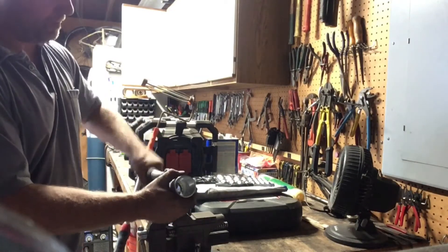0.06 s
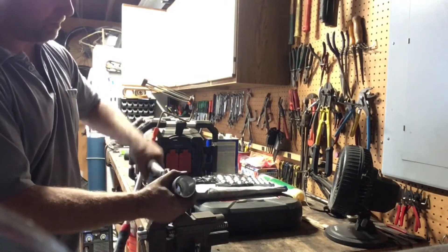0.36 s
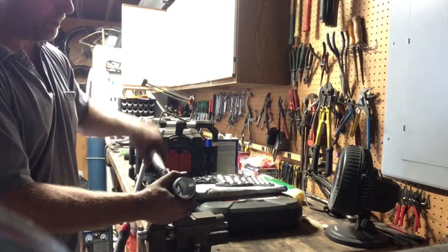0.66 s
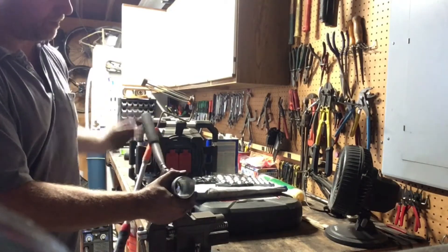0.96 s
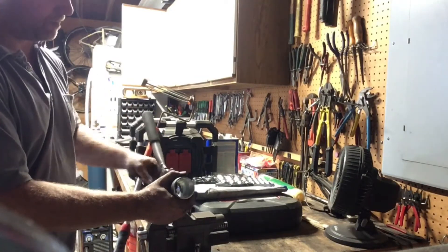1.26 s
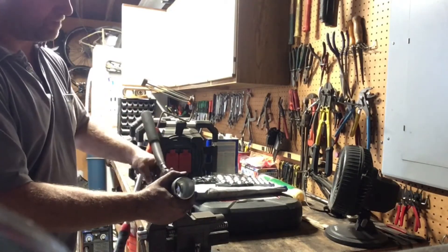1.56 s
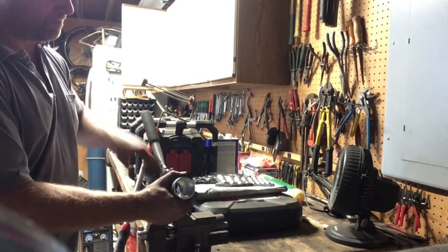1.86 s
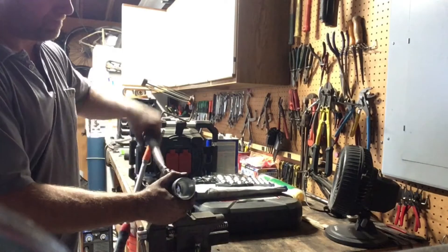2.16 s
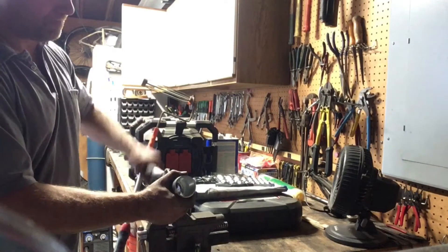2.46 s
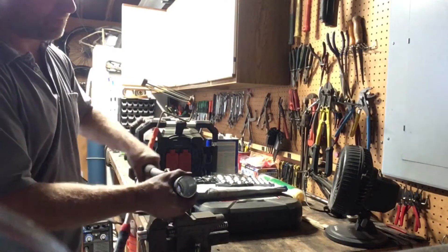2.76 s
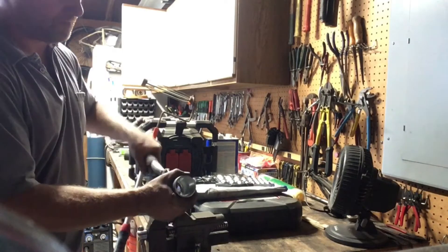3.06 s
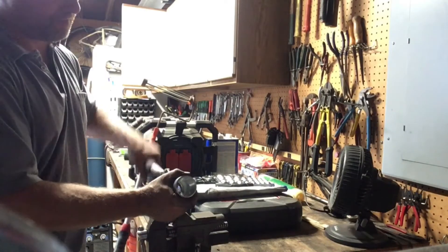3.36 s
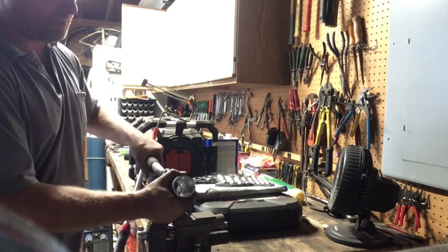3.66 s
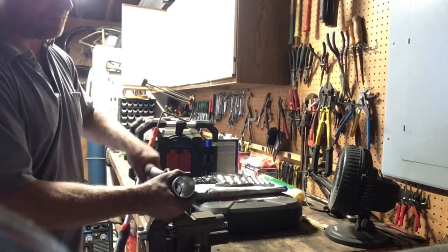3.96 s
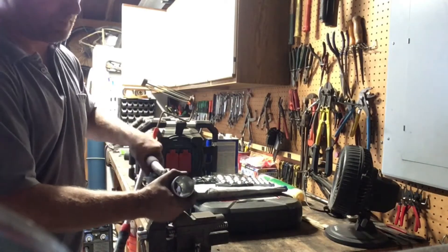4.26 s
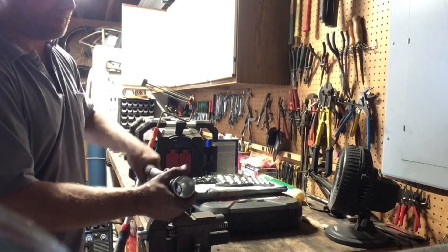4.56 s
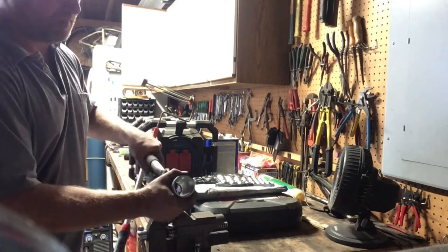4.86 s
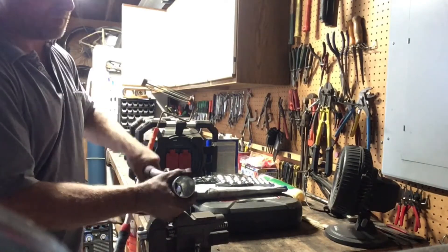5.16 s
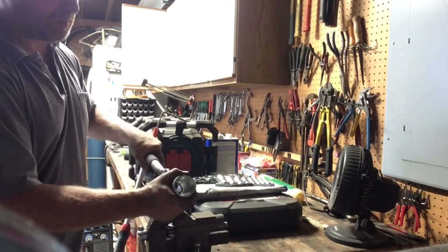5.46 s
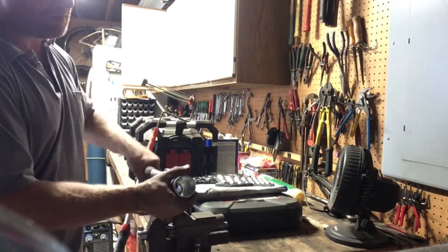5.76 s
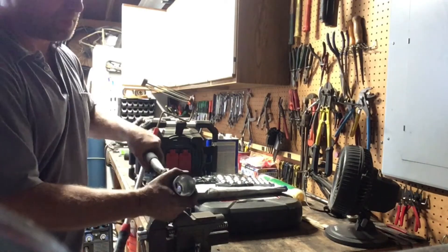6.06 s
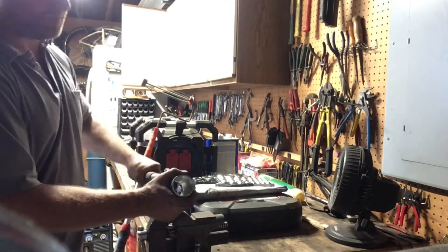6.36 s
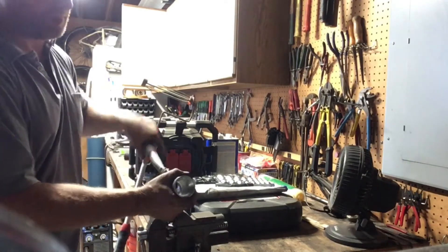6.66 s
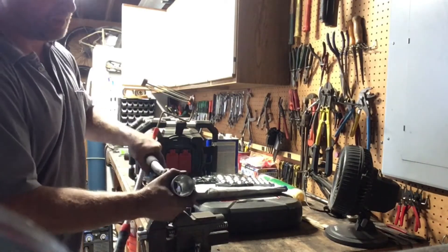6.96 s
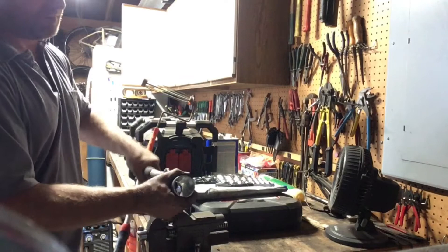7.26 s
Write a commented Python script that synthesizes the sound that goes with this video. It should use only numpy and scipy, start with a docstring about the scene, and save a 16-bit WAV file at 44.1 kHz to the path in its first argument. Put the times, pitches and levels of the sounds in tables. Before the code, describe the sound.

Steel cracks sharply twice as a hand-cranked tool presses a groove into a pipe, each stroke thumping the workbench. The work pauses briefly for faint scraping and small clicks, then resumes with eight evenly paced, ringing clacks, each trailed by the high ping of a loose part. The handle knocks and clinks on its back swings, over the low rumble and short echo of a workshop.

```python
"""A hand beading tool in a bench vise is cranked around a metal pipe, over a workshop's low rumble.
It opens with two sharp bites: each rings the steel and thumps the bench, then a loose part lands with a ping.
From about 1 s the hands pause to tighten the rollers, with faint scrapes, chirps and a few clicks.
From about 2.5 s eight more bites follow and a groove (the bead) forms in the pipe. Between them the
handle clicks as it swings back, squeaks once, and clinks as the tool settles for the next stroke."""
import sys
import numpy as np
from scipy import signal
from scipy.fft import rfft, irfft
from scipy.io import wavfile

SR = 44100
rng = np.random.default_rng(int(sys.argv[2]) if len(sys.argv) > 2 else 0)


def digitize_waveform(pressure):
    """Quantize a signal to 16-bit integers and store it at the path in sys.argv[1].

    Rows of a 2-D input are taken as channels; values are limited to [-1, 1].
    """
    field = np.atleast_2d(pressure).T
    bounded = np.clip(field, -1, 1)
    quanta = np.round(bounded * 32767).astype(np.int16)
    wavfile.write(sys.argv[1], SR, quanta)


N = 331191
TIME = np.arange(N) / SR  # seconds since the scene began
AGE = np.arange(SR) / SR  # seconds since a blow
FREQS = np.arange(SR // 2 + 1) + 1e-3  # the frequencies [Hz] in a one-second sound


def undb(db):
    """Turn decibels into a number to multiply by."""
    return 10 ** (np.asarray(db) / 20)


def add(track, s, sound):
    """Mix a sound into the track, starting at s seconds."""
    start = int(round(s * SR))
    a, b = max(start, 0), min(start + len(sound), N)
    track[a:b] += sound[a - start:b - start]


def along(hz, points_hz, values):
    """Join points with straight lines, giving every octave the same room."""
    return np.interp(np.log(hz), np.log(points_hz), values)


def bump(hz, centre_hz, width_hz, db):
    """A rounded peak in a sound's tone, in dB; a negative one is a dip."""
    return db / (1 + (2 * (hz - centre_hz) / width_hz) ** 2)


def fade(fade_s):
    """A blow dies away, losing 60 dB over its fade time."""
    return undb(-60 * AGE / fade_s)


def swell(rise_s):
    """Vibration takes a moment to build up."""
    return 1 - np.exp(-AGE / rise_s)


def pressed(extra_db, length_s):
    """Steel sounds louder while the parts are still pressed together."""
    return undb(extra_db * np.exp(-(AGE / length_s) ** 2))


def ring(tones, detune):
    """A struck part's fading tones; neighbours swing opposite ways and the load shifts each pitch."""
    shifts = 1 + detune * rng.standard_normal(len(tones))
    return sum((-1) ** k * undb(db) * fade(fade_s) * np.sin(2 * np.pi * hz * shifts[k] * AGE)
               for k, (hz, db, fade_s) in enumerate(tones))


def steady_noise(colour):
    """Even noise of strength 1, shaped by (frequency, level) points."""
    hz = np.arange(N // 2 + 1) * SR / N + 1e-3
    noise = irfft(rfft(rng.standard_normal(N)) * undb(along(hz, *np.transpose(colour))), N)
    return noise / noise.std()


def grainy_noise(grain_db, grain_s=0.0016):
    """One second of noise made of many tiny, uneven contacts."""
    strength = np.interp(AGE / grain_s, np.arange(SR), rng.standard_normal(SR))
    noise = rng.standard_normal(SR) * undb(grain_db * strength)
    return noise / noise.std()


def bead_depth(s, start_s=2.55, forming_s=1.27):
    """Once the rollers are tight, the groove deepens steadily from 0 to 1."""
    return np.clip((s - start_s) / forming_s, 0, 1)


def beaded(tones, depth):
    """The groove stiffens the pipe as it deepens: some tones grow, others weaken."""
    return [(hz, db + (1 - depth) * shallow_db, fade_s) for hz, db, fade_s, shallow_db in tones]


# the tone of the workshop's air: (frequency [Hz], level [dB])
AIR_COLOUR = [(13, -47), (22, -23), (64, 5), (87, -9.5), (432, -18), (672, -30.5), (988, -29.5),
              (2320, -61), (2820, -49), (6270, -47), (16000, -53)]
def room_air():
    """The room's low, steady rumble."""
    return undb(-51) * steady_noise(AIR_COLOUR)


# the tone of the rubbing: (frequency [Hz], level [dB])
RUB_COLOUR = [(20, 3.5), (52, 2.5), (110, 5.5), (200, -14.5), (450, -22.5), (950, -22.5), (1800, -30),
              (4000, -42.5), (9000, -46), (16000, -50)]
def rubbing(level_db=-46.5, waver_db=2, pause_s=0.94, resume_s=2.54, pause_db=-6, ease_s=0.051):
    """The turning tool rocks the bench unevenly, less while the hands pause to tighten the rollers."""
    waver = np.interp(TIME, np.linspace(0, TIME[-1], 90), rng.standard_normal(90))
    paused = (np.tanh((TIME - pause_s) / ease_s) - np.tanh((TIME - resume_s) / ease_s)) / 2
    return steady_noise(RUB_COLOUR) * undb(level_db + pause_db * paused + waver_db * waver)


# the tone all scrapes share: (frequency [Hz], level [dB])
SCRAPE_COLOUR = [(250, -9), (440, 12.5), (700, 6.5), (1400, -2.5), (1800, -0.5), (2400, -3.5),
                 (4500, -13.5), (7000, -16), (9000, -16), (16000, -24)]
# slides of the handle: (middle time [s], length [s], level [dB], favoured pitch [Hz])
SCRAPES = [(0.985, 0.062, -57.5, 1330), (1.038, .09, -62, 448), (1.231, 0.12, -64.5, 6740),
           (1.295, 0.032, -55, 1370), (1.561, 0.49, -71, 2480), (3.177, 0.16, -60.5, 5200),
           (4.715, 0.13, -54.5, 3400), (7.069, 0.26, -54, 4200)]
def scrapes(grit_db=2):
    """The handle slides over the steel; where it touches decides which pitch stands out."""
    out = np.zeros(N)
    for s, length_s, db, hz in SCRAPES:
        colour = along(FREQS, *np.transpose(SCRAPE_COLOUR)) + bump(FREQS, hz, 0.48 * hz, db=11)
        noise = irfft(rfft(rng.standard_normal(SR)) * undb(colour), SR)
        pressure = np.exp(-(2 * AGE / length_s - 2) ** 4)
        add(out, s - length_s / 2, undb(db) * noise / noise.std() * pressure)
    # the level flickers as dry steel sticks and slips
    grit = np.interp(TIME, np.arange(2000) / 250, rng.standard_normal(2000))
    return out * undb(grit_db * grit)


def squeak(start_s=4.665, length_s=0.085, start_hz=3660, rise=0.133, level_db=-60.5):
    """One thin squeak of dry steel; its pitch bends up as the handle speeds up."""
    progress = np.clip((TIME - start_s) / length_s, 0, 1)
    wobble = 1 + 0.057 * rng.standard_normal(N)  # sticking and slipping blur the pitch
    hz = start_hz * (1 + rise * progress ** 4) * wobble
    return undb(level_db) * np.sin(np.pi * progress) * np.sin(2 * np.pi * np.cumsum(hz) / SR)


def squeal(hz, peak_s, width_s, echo_db):
    """Steel slides on steel for an instant and sings around one high pitch."""
    band = irfft(rfft(rng.standard_normal(SR)) * np.exp(-((FREQS - hz) / 170) ** 2), SR)
    slip = np.exp(-((AGE - peak_s) / width_s) ** 2)
    echo = undb(echo_db) * fade(0.27) * swell(peak_s)
    return band / band.std() * (slip + echo) * swell(0.001)


# the two tones of a chirp: (pitch [Hz], level [dB])
CHIRP_TONES = [(1950, -7), (2400, -1)]
# lifts of the handle: (time [s], level [dB])
CHIRPS = [(1.138, -55), (1.298, -58)]
def chirps():
    """Dry steel chirps briefly as the handle is lifted."""
    out = np.zeros(N)
    for s, db in CHIRPS:
        for hz, tone_db in CHIRP_TONES:
            add(out, s, undb(db + tone_db) * squeal(hz, peak_s=0.0052, width_s=0.0028, echo_db=-18))
    return out


# how long the workshop echoes: (frequency [Hz], fade time [s])
ROOM_ECHO = [(150, 0.6), (900, 0.56), (3000, 0.35), (7000, 0.29), (14000, 0.24)]
def contact(noise, bands, peaks, treble_db, rise_cycles, ripple_db=3.5):
    """Struck steel rings at countless pitches; each band dies quickly, then lingers in the room."""
    band_hz, band_db, _, _ = np.transpose(bands)
    colour = along(FREQS, band_hz, band_db) + treble_db / (1 + (2400 / FREQS) ** 4)
    colour += sum(bump(FREQS, *peak) for peak in peaks)
    # every blow lands a little differently and favours other pitches, drawn 75 Hz apart
    colour += ripple_db * np.interp(FREQS / 75, np.arange(1000), rng.standard_normal(1000))
    bass_cut = FREQS ** 2 / (FREQS ** 2 + (band_hz[0] / 2) ** 2)
    spectrum = rfft(noise) * undb(colour) * bass_cut
    out = 0
    for (hz, _, fade_s, echo_db), share in zip(bands, np.eye(len(bands))):
        band = irfft(spectrum * along(FREQS, band_hz, share), SR)
        echo = undb(echo_db) * fade(along(hz, *np.transpose(ROOM_ECHO)))
        out += band * np.hypot(fade(fade_s), echo) * swell(rise_cycles / hz)  # lows build up later
    return out


# tones of bench and vise: (pitch [Hz], level [dB], fade time [s], extra while the groove is shallow [dB])
BENCH_TONES = [(52.67, -25.5, 0.81, -3), (64.26, -33, 0.98, -6), (100.3, -15.5, 0.31, -2),
               (129.4, -29, 0.47, 0.5), (169.4, -19.5, 0.14, 5.5), (199, -25.5, 0.23, -2.5),
               (224.7, -29, 0.17, -1), (288.3, -36.5, 0.22, 4), (328.3, -29.5, .25, -3)]
def bench_thump(s, detune, rise_s):
    """A blow passes through the vise and the bench answers with a low thump."""
    return ring(beaded(BENCH_TONES, bead_depth(s)), detune) * swell(rise_s)


# the noise of a clink: (frequency [Hz], level [dB], fade time [s], echo [dB])
CLINK_BANDS = [(150, 12, 0.54, -21.5), (480, 9.5, 0.27, -33), (1010, 13, 0.1, -18), (2390, -6.5, 0.17, -21),
               (4360, -15.5, 0.05, -8.5), (8050, -18.5, 0.058, -16), (14500, -31, 0.034, -15)]
# pitches that stand out in it: (pitch [Hz], width [Hz], boost [dB])
CLINK_PEAKS = [(424, 99, 10.2), (1252, 39, 12), (4250, 510, 9.3)]
# the handle's ring after a clink: (pitch [Hz], level [dB], fade time [s])
CLINK_TONES = [(3150, -32, 0.31), (3460, -34, 0.16), (4230, -17, .1), (4400, -7, .09), (4520, -7, 0.24),
               (4560, -7, .18)]
# each time the tool settles: (time [s], relative level [dB], treble [dB])
CLINKS = [(0.383, -50, -13), (.412, -55, 1), (2.317, -45.5, -2.5), (4.278, -52.5, -3.5), (4.858, -48.5, -9),
          (5.451, -47.5, 2), (6.0676, -47.5, 7), (6.8704, -44.5, 6.5)]
def clinks(thump_db=-16):
    """The tool settles for the next stroke with a dull clink that rings the handle and bumps the bench."""
    out = np.zeros(N)
    for s, db, treble_db in CLINKS:
        noise = grainy_noise(grain_db=-0.5)
        clink = contact(noise, CLINK_BANDS, CLINK_PEAKS, treble_db, rise_cycles=1.5, ripple_db=0.3)
        add(out, s, undb(db + 9) * clink)
        ringing = ring(CLINK_TONES, detune=0.003) * pressed(extra_db=17.5, length_s=0.0067)
        add(out, s, undb(db + 1.2 * treble_db - 11.5) * ringing)  # harder contact rings more
        add(out, s + 0.0139, undb(thump_db) * bench_thump(s, detune=0.051, rise_s=0.04))
    return out


# the noise of a click: (frequency [Hz], level [dB], fade time [s], echo [dB])
CLICK_BANDS = [(200, 2, 0.22, -7), (500, -1.5, 0.3, -8.5), (910, 6.5, 0.22, -23), (1905, 6, 0.13, -17),
               (2920, -5.5, 0.16, -7.5), (4070, 0, 0.07, -13.5), (5920, -12.5, 0.16, -8),
               (9540, -18.5, 0.089, -12.5), (15000, -27.5, .03, -1.5)]
# pitches that stand out in it: (pitch [Hz], width [Hz], boost [dB])
CLICK_PEAKS = [(872, 320, 4), (2590, 500, -4.5), (3190, 120, 2.5), (3480, 130, 6.5), (4420, 510, 2),
               (5400, 1100, -8.5), (6660, 180, 10), (7200, 880, 6), (8200, 360, 12)]
# tones of the knocked handle: (pitch [Hz], level [dB], fade time [s])
KNOCK_TONES = [(431, -4, 0.24), (599, -7.5, 0.18), (865, -2.5, 0.31), (995, 0, 0.25), (1314, -3.5, 0.26),
               (1514, -18.5, 0.11), (1865, -9, 0.16), (1960, -10, .15), (3180, -31, .17),
               (3420, -18.5, 0.14), (4100, -27, 0.168), (6440, -23.5, .2), (8300, -19.5, 0.14)]
# each click of the handle: (time [s], relative level [dB], treble [dB], favoured pitch [Hz])
CLICKS = [(.227, -36, 2.5, 3000), (0.733, -41, -0.5, 1050), (2.186, -57.5, 6, 2200),
          (2.204, -34.5, 5.5, 1690), (2.284, -43, -5, 990), (2.933, -40, -12.5, 3900),
          (3.076, -35.5, -0.5, 960), (3.119, -44.5, -4.5, 4200), (3.493, -35.5, -21, 2330),
          (3.631, -36, -3, 900), (4.121, -36.5, -13.5, 2350), (4.237, -46, -12, 1600),
          (4.744, -41, -10, 1620), (4.785, -41.5, -10, 2720), (5.343, -43.5, -3.5, 1040),
          (5.912, -58, 4, 5300), (5.9735, -28.5, 2.5, 1590), (6.72, -30, -4.5, 1440),
          (6.825, -55.5, 6, 7200), (7.4416, -27, -13, 3530)]
def clicks(alike=0.4, thump_db=-11, thump_share=0.35):
    """The handle takes up its slack on the back swing and knocks; the bench answers in part."""
    out, shared_noise = np.zeros(N), rng.standard_normal(SR)
    for s, db, treble_db, hz in CLICKS:
        peaks = CLICK_PEAKS + [(hz, 0.3 * hz, 8.5)]  # where it touches decides which pitch stands out
        noise = np.sqrt(alike) * shared_noise + np.sqrt(1 - alike) * rng.standard_normal(SR)
        click = contact(noise, CLICK_BANDS, peaks, treble_db, rise_cycles=1, ripple_db=1.5)
        add(out, s, undb(db + 2) * click * pressed(extra_db=5.5, length_s=0.0022))
        knock = ring(KNOCK_TONES, detune=0.012) * swell(0.0046)
        add(out, s, undb(db - 7) * knock * pressed(extra_db=0.5, length_s=0.015))
        thump = bench_thump(s, detune=0.028, rise_s=0.027)
        add(out, s + 0.007, undb(thump_db + thump_share * db) * thump)
    return out


# the noise of the loose part's hit: (frequency [Hz], level [dB], fade time [s], echo [dB])
TINK_BANDS = [(2500, -68, 0.024, -6), (6000, -49, 0.042, -10), (10900, -44.5, 0.11, -11),
              (14430, -58, .05, -8)]
# pitches that stand out in it: (pitch [Hz], width [Hz], boost [dB])
TINK_PEAKS = [(10575, 100, 16.5), (10660, 150, 9.3), (12200, 200, 4.4)]
def tink(scatter=0.0075):
    """A small loose part hits the steel, never quite the same way twice."""
    peaks = [(hz * (1 + scatter * rng.standard_normal()), width, db) for hz, width, db in TINK_PEAKS]
    return contact(grainy_noise(grain_db=3), TINK_BANDS, peaks, treble_db=2, rise_cycles=5.9)


# the loose part's lasting ring: (pitch [Hz], level [dB], fade time [s])
PING_TONES = [(9383, -49, 0.45), (9230, -54, 0.3), (11260, -44, .17), (11400, -49, 0.2)]
def ping(landing_db, ring_db):
    """The loose part lands and goes on ringing very high."""
    return undb(landing_db) * tink() + undb(ring_db) * ring(PING_TONES, detune=0.00013) * swell(0.016)


# the noise of a bite: (frequency [Hz], level [dB], fade time [s], echo [dB])
BITE_BANDS = [(146, -1, 0.25, -15), (398, -16, 0.26, -12.5), (1020, -11.5, 0.22, -15),
              (1600, -23.5, 0.21, -10.5), (2550, -28, 0.14, -6.5), (5000, -33, 0.081, -11),
              (7200, -29.5, 0.12, -6), (10800, -34.5, 0.072, -11), (14940, -52, 0.0554, -4.5)]
# pitches that stand out in it: (pitch [Hz], width [Hz], boost [dB])
BITE_PEAKS = [(3160, 77, 5.5), (3760, 180, 3.5), (4380, 670, 7.5), (5473, 58, 7), (5600, 40, -2.5),
              (6260, 100, 6), (6960, 150, 4), (8370, 65, -5.5), (9180, 94, 7), (11540, 150, 11)]
# tones of tool and pipe: (pitch [Hz], level [dB], fade time [s], extra while the groove is shallow [dB])
TOOL_TONES = [(380.3, -29.5, 0.38, -1.5), (430.5, -21, 0.16, 1.5), (508, -37, 0.15, 3.5),
              (558, -34.5, .17, -3.5), (616, -19, 0.071, 3), (690, -39.5, 0.24, -10),
              (806, -33.5, 0.4, -1.5), (827, -32.5, 0.38, -7.5), (857, -28.5, 0.07, 9),
              (971, -22.5, .19, -4), (1008, -27, .15, 0), (1050, -20.5, .19, -3), (1135, -24, .13, -5),
              (1205, -27, .13, -6), (1245, -25, .16, -7), (1290, -31, .14, 0), (1337, -29, .17, 1),
              (1440, -35.5, .15, 5.5), (1592, -40, 0.071, 18.5), (1762, -35.5, 0.051, 18.5),
              (1920, -45.5, .15, 15), (2120, -31, 0.11, -1), (2054, -37, .17, -4), (2250, -32, 0.095, -9),
              (2820, -44.5, .2, 3)]
# one bite per stroke: (time [s], relative level [dB], treble level [dB], high squeal [dB],
# low squeal [dB], loose part's landing [dB], loose part's ring [dB])
BITES = [(-.016, -6.5, 0, -68, -45, -19, -35), (0.4933, -5.5, 1, -70, -42, -21, -35),
         (2.5547, -1, -1, -29, -37, 3.5, -6), (3.2551, -6, 1, -31.5, -32, 9, 3),
         (3.8372, -4.5, 0.5, -27, -32.5, 10.5, 4.5), (4.4725, -5.5, -3, -60, -29.5, 7.5, -7),
         (5.0571, -5, -4, -43.5, -31.5, 8, -10), (5.6656, -4, -0.5, -46, -31, 9, 3),
         (6.4101, -5, -1.5, -41, -25, 13, 3), (7.167, -3.5, -1, -36, -23.5, 13.5, -10.5)]
def bites(alike=0.47, thump_db=-1.5, thump_lag_s=0.00817, fall_s=0.069, graze_s=7.2146, graze_db=2):
    """The tool snaps forward: steel cracks, rings and squeals, the bench thumps, a loose part jumps."""
    out, shared_noise = np.zeros(N), rng.standard_normal(SR)
    for s, db, treble_db, high_db, low_db, _, _ in BITES:
        depth = bead_depth(s)
        # the tool stays put, so much of its echo pattern is the same each time
        noise = np.sqrt(alike) * shared_noise + np.sqrt(1 - alike) * grainy_noise(grain_db=2)
        peaks = BITE_PEAKS + [(1130, 710, 3.9 * depth)]  # a deeper groove gives a more focused knock
        crack = contact(noise, BITE_BANDS, peaks, treble_db - db, rise_cycles=1)
        add(out, s, undb(db + 6) * crack)
        ringing = ring(beaded(TOOL_TONES, depth), detune=0.008) * swell(0.0029)
        add(out, s, undb(db - 3) * ringing * pressed(extra_db=5.5, length_s=0.09))
        add(out, s + thump_lag_s, undb(thump_db) * bench_thump(s, detune=0.02, rise_s=0.0081))
        add(out, s, undb(high_db) * squeal(hz=10960, peak_s=0.013, width_s=0.0062, echo_db=-16))
        add(out, s, undb(low_db) * squeal(hz=7330, peak_s=0.0045, width_s=0.0028, echo_db=-22.5))
    # the jolted part falls for the same time after every bite
    for s, *_, landing_db, ring_db in BITES:
        add(out, s + fall_s, ping(landing_db, ring_db))
    add(out, graze_s, undb(graze_db) * tink())  # once it also grazes the steel on its way down
    return out


def scene():
    """Tool, handle and bench over the workshop's steady air, in one channel."""
    return (bites() + clicks() + clinks() + chirps() + scrapes() + squeak() + rubbing() + room_air())[None]


def record(dry):
    """The microphone has one narrow dip in its tone and loses the deepest rumble and highest treble."""
    hz = np.arange(N // 2 + 1) * SR / N
    dipped = irfft(rfft(dry) * undb(bump(hz, centre_hz=1133, width_hz=33.7, db=-4.5)), N)
    rumble_cut = signal.butter(2, 30, "high", fs=SR, output="sos")
    treble_cut = signal.ellip(8, 0.2, 70, 15900, fs=SR, output="sos")
    return signal.sosfilt(treble_cut, signal.sosfilt(rumble_cut, dipped))


dry = scene()
out = record(dry)
digitize_waveform(out)
```